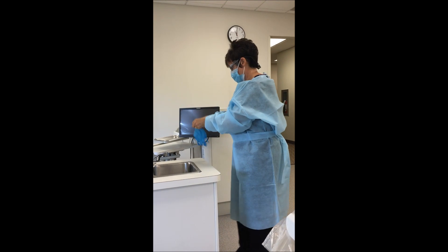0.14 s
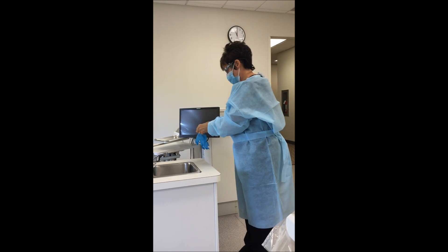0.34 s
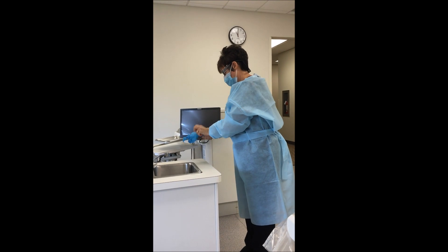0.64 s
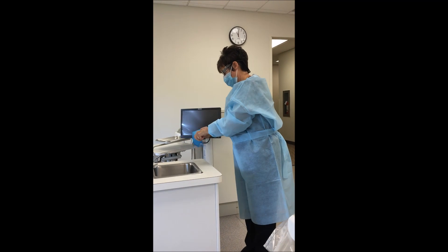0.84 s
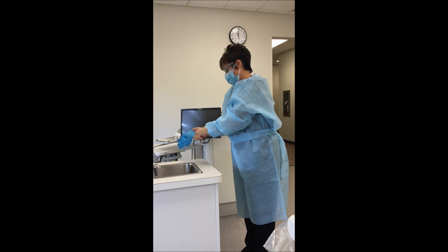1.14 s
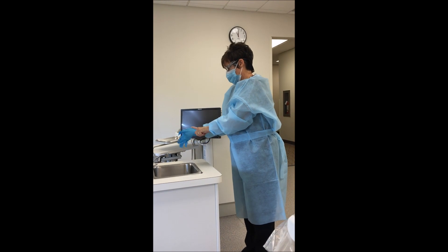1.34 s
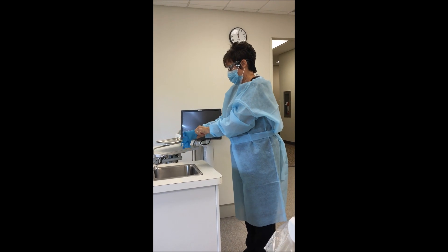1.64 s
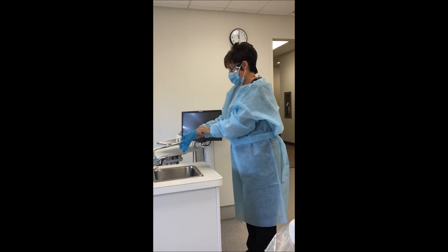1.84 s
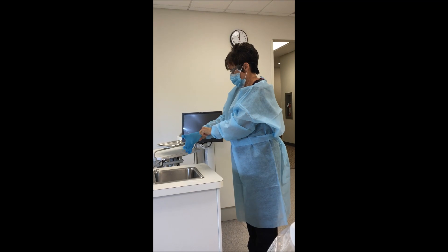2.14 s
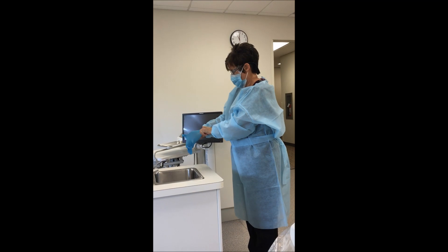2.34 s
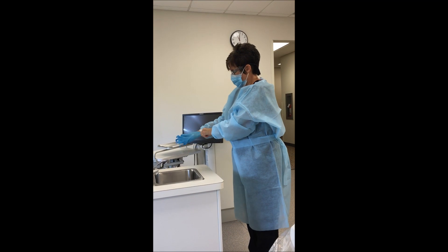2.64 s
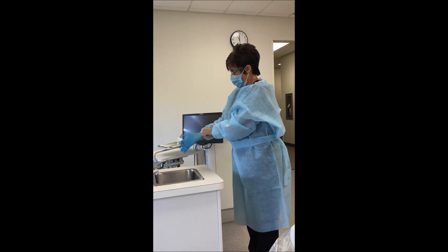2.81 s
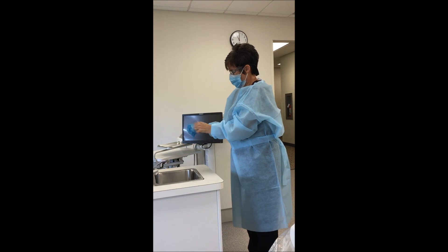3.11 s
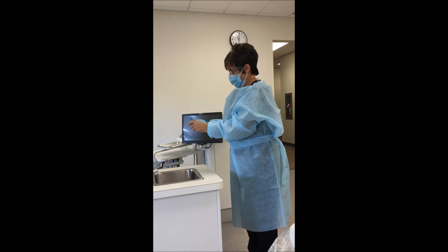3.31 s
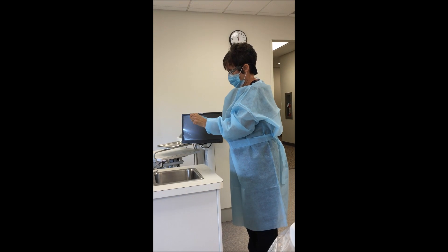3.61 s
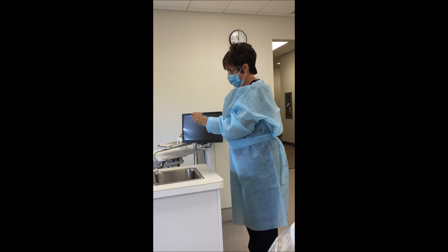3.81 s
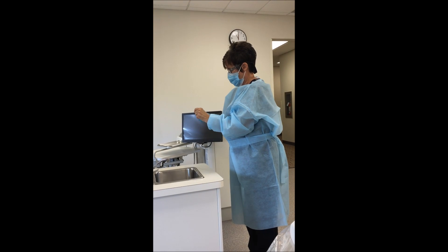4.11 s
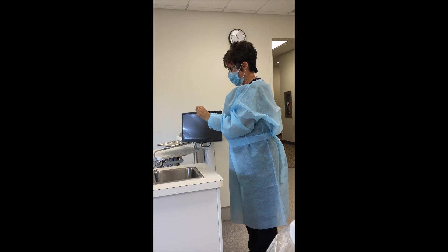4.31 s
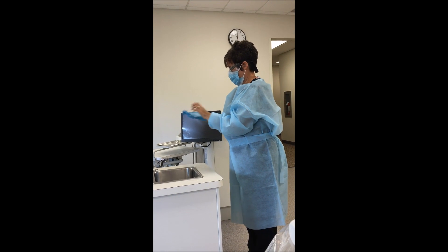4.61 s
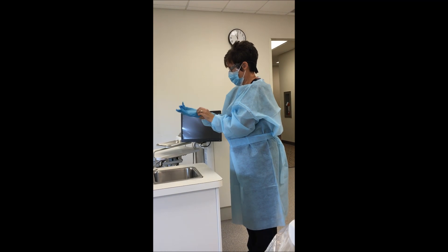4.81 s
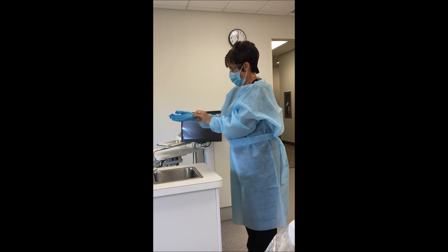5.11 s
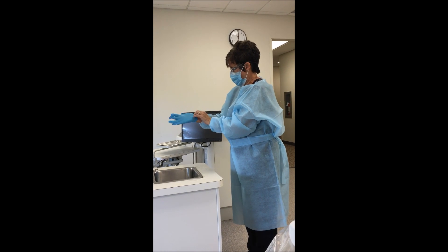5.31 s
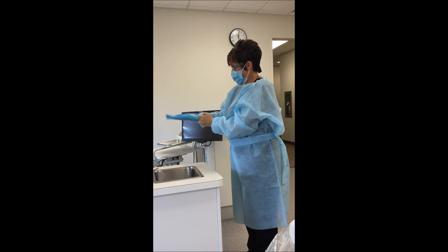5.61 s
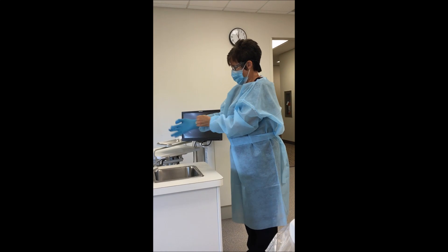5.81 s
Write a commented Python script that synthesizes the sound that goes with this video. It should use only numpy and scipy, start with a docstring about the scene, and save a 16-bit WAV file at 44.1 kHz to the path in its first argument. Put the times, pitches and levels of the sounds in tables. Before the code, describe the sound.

Thin exam gloves are pulled onto two hands in a small clinic room, a couple of metres from the microphone. The rubber slides over skin in short rubs and crinkles, then fingers pop into place and stretched cuffs snap back. After a quieter spell comes one more quick flurry of snaps. A low ventilation rumble with hum and faint hiss runs underneath.

```python
"""A small clinic room, where thin exam gloves are pulled onto two hands a couple of metres away.
Rubber sticks and slips over the skin in short rubs, and small folds flip over as crinkles.
Fingers pop into place and stretched cuffs snap back, slapping out air and shaking the rubber.
Floor, walls and ceiling answer every snap; underneath runs a bed of ventilation rumble, hum and hiss."""
import sys
import numpy as np
from scipy import signal
from scipy.fft import rfft, irfft, next_fast_len
from scipy.io import wavfile
from scipy.ndimage import map_coordinates

SR = 44100
rng = np.random.default_rng(int(sys.argv[2]) if len(sys.argv) > 2 else 0)


def pcm_store(signal):
    """Save signal as 16-bit PCM."""
    levels = np.round(np.clip(np.atleast_2d(signal), -1, 1) * 32767)
    wavfile.write(sys.argv[1], SR, levels.astype(np.int16).T)


N = 262395

# The colour of the duct rumble. Each row: frequency in Hz, relative level in dB.
RUMBLE_SPECTRUM = [(22, -44), (31, -18), (41, -7), (54, 2.5), (76, -4), (97, -10), (124, -1), (143, -5),
                   (154, -9.5), (200, -8), (300, -15.5), (390, -23), (480, -31), (610, -31), (1000, -68)]
# The colour of vent air and microphone hiss. Each row: frequency in Hz, relative level in dB.
HISS_SPECTRUM = [(410, -57), (700, 2.5), (747, 1), (798, 2), (863, 3), (958, 2), (1140, -1.5), (1420, -4),
                 (1820, -5), (4490, -8), (4860, -12), (5920, -10.5), (10500, -12), (11700, -7.5),
                 (16000, -15.5)]
# Strokes of rubber sliding over the hand. Each row: middle in seconds, half-width in seconds,
# level in dB, centre pitch in Hz, grip as the ring of each slip in cycles.
STROKES = [(0.026, 0.017, -66.5, 2570, 2), (0.039, 0.035, -70.5, 4640, 0.37),
           (0.369, 0.004, -58, 6060, 2.1), (1.174, 0.012, -57, 3060, 2.2), (1.254, 0.056, -63, 2330, 0.39),
           (1.301, 0.0044, -54, 6020, 3.3), (1.304, 0.0092, -54.5, 670, 1.2),
           (1.314, 0.027, -65, 8460, 0.42), (1.339, 0.013, -64, 740, 0.67), (1.437, .055, -72, 2680, 0.29),
           (1.571, 0.004, -61.5, 5100, 5), (1.634, 0.012, -73, 1530, 1.6), (1.877, 0.017, -61, 2230, 0.43),
           (1.954, 0.011, -59, 1040, 0.58), (2.114, 0.009, -60.5, 1910, 1.6),
           (2.292, 0.024, -63, 1700, 2.3), (2.345, 0.011, -61, 1680, 2.1), (2.706, 0.02, -59, 1410, 0.6),
           (2.772, 0.02, -59.5, 1050, 1.4), (2.936, 0.035, -69, 5840, 0.94),
           (2.971, 0.019, -59.5, 1700, 0.51), (3.061, 0.011, -50, 1220, 0.29),
           (3.205, .018, -58.5, 4380, 0.41), (3.649, 0.21, -82, 2180, 0.54),
           (3.781, 0.0058, -63, 2060, 1.94), (4.048, 0.0073, -63.5, 5750, 2.5),
           (4.372, 0.014, -64.5, 2030, 0.8), (4.864, 0.061, -73.5, 4800, 0.42),
           (5.567, 0.012, -61.5, 1360, 0.83), (5.694, 0.0092, -54, 3500, 0.53),
           (5.726, 0.018, -52, 10000, 0.66), (5.735, 0.025, -56.5, 4800, 0.51),
           (5.817, 0.019, -60, 5140, 1.2)]
# Rubber letting go against the skin. Each row: time in seconds, relative level in dB, patch pitch in Hz,
# patch ring in cycles, air slap in dB, slap pitch in Hz, tautness in dB, crack in dB, peel in dB,
# room send in dB. Slap, tautness, crack and peel are set against the snap's own level.
SNAP_HITS = [(0.021, -36.5, 2470, .8, -20, 500, -12, 1, 1, 3),
             (0.058, -38, 2120, .2, -20, 500, 1, -6, 1, -4),
             (0.369, -33.5, 1585, 0.28, -24, 500, -4, -5, 2, 5.5),
             (1.1592, -23, 1485, 0.15, -13, 810, -3, -2.5, -5.5, 3),
             (1.2812, -26, 1370, .7, -22, 500, -14, -20, -12, -5),
             (1.2985, -27.5, 1520, .2, -6, 750, -6, -14, -4, 2),
             (1.3044, -24.5, 1150, .3, -2, 650, -8, -25, -5, -1),
             (1.3284, -22, 1850, 0.29, 0.5, 800, -8.5, -12, -6, -0.5),
             (1.336, -27.5, 970, 0.35, 5.5, 617, -3, -25, -13, -1),
             (1.3625, -36, 1500, 0.24, 0, 600, -12, -22, -9, -3),
             (1.405, -33.5, 2160, .24, -20, 503, -14, -15, -4, 2),
             (1.475, -37, 1520, 0.25, -14, 500, -5, 2.5, -2, 2),
             (1.5729, -17, 1640, 0.51, -19, 504, -20, -40, -8, -2),
             (1.7492, -18, 1880, 0.55, -12, 400, -9, -14.5, -4, -1.5),
             (2.134, -23, 1100, 0.37, -6, 600, -11.5, -25, -6, -1.5),
             (2.2266, -3, 1600, 0.8, -4, 403, -15.5, -32, -20, -3.5),
             (2.415, -16, 1370, 0.28, -14, 500, -20, -17, -19, -1.5),
             (2.668, -9.5, 1440, 0.26, -14, 900, 6.5, -2.5, -9, -2.5),
             (2.7512, -26.5, 1510, 0.24, -12, 500, 0, -18, -12, 3.5),
             (2.766, -29.5, 1280, .28, -18, 500, 2, -22, -9, 0),
             (2.785, -25, 1620, .22, -18, 500, -6, -28, -18, 0),
             (2.803, -28.5, 1610, 0.21, -19, 500, -5, -24, -10, -3),
             (2.855, -19.5, 1570, 0.26, -19, 500, -16, -22.5, -19, -1.5),
             (3.0482, -14.5, 1690, 0.46, -5, 650, -10.5, -8.5, -17, -1),
             (3.1887, -14, 2400, 0.12, -13, 396, -14.5, -30, -10.5, -5),
             (3.216, -38.5, 2000, 0.16, -18, 500, 6, 11.5, -4, -2.5),
             (3.8858, -25, 2020, 0.43, -15, 496, -19, -30, -10, 1),
             (4.046, -22.5, 1996, .79, -4, 517, -17, -24, -2.5, -1),
             (5.5557, -24, 1450, 0.41, -14, 503, -16, -24, -6, 2),
             (5.5907, -30.5, 1190, 0.28, -2, 700, -8.5, -4, -14, 3.5),
             (5.6466, -44, 1800, .36, -10, 500, -2, 10.5, -2, 6),
             (5.6869, -29, 2100, 0.37, -1, 500, -3, -5, 4, 1),
             (5.7038, -16, 2220, 0.68, -17, 400, 2, 4.5, -19, 0),
             (5.806, -33, 2100, .2, -14, 700, 2, -10, -7, -2),
             (5.8303, -26, 1700, 0.16, 2, 785, -5.5, -22, -6, -3),
             (5.8369, -32.5, 1900, .2, -5, 750, 2, -10, -7, -3.5)]
# Modes of a taut fold. Each row: pitch as a multiple of the patch's, relative level in dB, ring in cycles.
FOLD_MODES = [(2.1, -1, 0.93), (2.65, -5.5, 2.4)]
# Modes of the rolled rim. Each row: pitch in Hz, relative level in dB, ring in cycles.
RIM_MODES = [(6200, 1, 1.7), (7240, -6.5, 1.75)]
# Early reflections, from the arm to the far wall. Each row: delay in seconds, relative level in dB.
REFLECTIONS = [(.0009, -23), (.0058, -7.5), (.0067, -16.5), (.0107, -18), (.0127, -11), (.0141, -19),
               (.0222, -23), (.0283, -33.5)]
# The room's reverb tail. Each row: frequency in Hz, time to fall 60 dB in seconds.
ROOM_DECAY = [(300, 0.41), (1500, 0.18), (2400, 0.3), (3500, 0.29), (6500, 0.2), (10000, 0.25),
              (15000, 0.11)]

TOP_HZ = 16100  # the microphone's band limit


def amp(db):
    """Decibels to gain."""
    return 10 ** (np.asarray(db) / 20)


def unit(x):
    """Scale to rms 1."""
    return x / np.sqrt(np.mean(x ** 2) + 1e-20)


def along(points, hz):
    """Read a curve of (Hz, value) points on a log frequency axis."""
    freqs, values = np.transpose(points)
    return np.interp(np.log(hz + 1), np.log(freqs + 1), values)


def filtered(x, response):
    """EQ x with a gain given as a function of frequency."""
    size = next_fast_len(len(x) + 8192)
    return irfft(rfft(x, size) * response(np.fft.rfftfreq(size, 1 / SR)), size)[:len(x)]


def noise(spectrum):
    """Coloured noise of rms 1."""
    return unit(filtered(rng.standard_normal(N), lambda hz: amp(along(spectrum, hz))))


def wobble(rate):
    """A smooth random curve with rate knots a second."""
    knots = rng.standard_normal(int(N * rate / SR) + 4)
    return map_coordinates(knots, [np.arange(N) * rate / SR])


def add(track, start_s, sound):
    """Mix a sound into the track."""
    index = round(start_s * SR) + np.arange(len(sound))
    inside = (index >= 0) & (index < N)
    track[index[inside]] += sound[inside]


def room(x, tail_db, send_db=0, build_s=0.0008, corridor_db=-17.5, corridor_t60=1):
    """Slightly hollow direct sound, duller reflections and a tail new for each place of the hands."""
    hz, t, bands = signal.stft(rng.standard_normal(SR * 2 // 3), SR, nperseg=256)
    room_fade = amp(-60 * t / along(ROOM_DECAY, hz)[:, None])
    corridor_fade = amp(corridor_db - 60 * t / corridor_t60)  # through the open door
    tail = signal.istft(bands * (room_fade + corridor_fade), SR, nperseg=256)[1]
    tail *= 1 - np.exp(-np.arange(len(tail)) / SR / build_s)  # echoes take a moment to thicken
    early = np.zeros(len(tail))
    for delay_s, db in REFLECTIONS:
        early[round(delay_s * rng.uniform(.96, 1.04) * SR)] += amp(db + send_db)
    early = signal.lfilter(*signal.butter(1, 7300, fs=SR), early)
    early[0] += 1  # the direct sound
    hollow_band = signal.lfilter(*signal.iirpeak(770, Q=3.4, fs=SR), early)
    early -= (1 - amp(-5.5)) * hollow_band  # a 5.5 dB scoop
    return signal.fftconvolve(x, early + amp(tail_db + send_db) * tail / np.linalg.norm(tail))


def drone(hz, wander_hz):
    """A tone of rms 1 whose pitch drifts with the turbulent air."""
    pitch_hz = hz + wander_hz * wobble(rate=22)
    return unit(np.sin(2 * np.pi * np.cumsum(pitch_hz) / SR))


def ventilation():
    """The bed: billowing duct rumble, a hum surging with the turbulence, a thin fan tone, faint hiss."""
    rumble = unit(amp(1.04 * wobble(rate=14)) * noise(RUMBLE_SPECTRUM))
    hum = amp(-49 + 5.5 * np.tanh(wobble(rate=10))) * drone(hz=126.25, wander_hz=7.83)
    fan = amp(-64.5 + 2.7 * wobble(rate=6.3)) * drone(hz=359.8, wander_hz=0.77)
    plain_hiss = noise(HISS_SPECTRUM)
    combed_hiss = room(noise(HISS_SPECTRUM), tail_db=-13)[:N]
    hiss = unit(plain_hiss + amp(-2.5) * combed_hiss)
    return amp(-43.5) * rumble + hum + fan + amp(-68) * hiss


def flap(t, hz, cycles):
    """A damped rubber mode of energy 1 that swells and dies; cycles is the time constant of its ring."""
    age = t * hz / cycles
    ring = age ** 2 * np.exp(-age) * np.sin(2 * np.pi * hz * t)
    return ring / np.linalg.norm(ring)


def rubs(slips_per_s=2600, pitch_spread=0.24, scatter_db=3):
    """Sliding rubber sticks and slips in a swarm of tiny flaps; more grip narrows it towards a squeak."""
    track, t = np.zeros(N), np.arange(SR // 100) / SR
    for middle_s, half_s, db, hz, grip in STROKES:
        span_s = 4 * half_s  # fades included
        length, count = int(span_s * SR), int(span_s * slips_per_s)
        swarm = np.zeros(length + len(t))
        starts = rng.integers(0, length, count)
        for start, (pitch, size) in zip(starts, rng.standard_normal((count, 2))):
            slip_hz = min(hz * np.exp(pitch_spread * pitch / grip), SR / 3)
            swarm[start:start + len(t)] += amp(scatter_db * size) * flap(t, slip_hz, grip)
        stroke = amp(db) * unit(swarm[:length]) * np.hanning(length)
        add(track, middle_s - span_s / 2, room(stroke, tail_db=-4.5))
    return track


def release(lead, peel_db, peel_s=0.0057, settle_s=0.0021, lead_in_s=0.006, lead_in_db=-18.5):
    """Rubber peels off the skin in tiny slips, lets go lead samples in and settles."""
    t = np.arange(-lead, lead) / SR
    fade_s = np.where(t < 0, peel_s * amp(peel_db), settle_s)  # cleaner snaps peel more briefly
    slips = rng.standard_normal(len(t)) ** 3 * np.exp(-np.abs(t) / fade_s)
    slips *= amp(peel_db) / np.linalg.norm(slips)
    # a faint noise swell just before the snap
    lead_in = rng.standard_normal(len(t)) * np.exp(-np.abs(t) / lead_in_s) * (t < 0)
    drive = slips + amp(lead_in_db) * lead_in / np.linalg.norm(lead_in)
    drive[lead] += 1  # the main let-go
    return drive / np.linalg.norm(drive)


def crack(t, decay_s, band_hz):
    """The sharp smack of contact, energy 1: one tick with a brief sizzle behind it."""
    burst = rng.standard_normal(len(t)) * np.exp(-t / decay_s)
    burst /= np.linalg.norm(burst)
    burst[0] += amp(-7)
    burst = signal.sosfilt(signal.butter(2, band_hz, 'bp', fs=SR, output='sos'), burst)
    return burst / np.linalg.norm(burst)


def snaps():
    """Each snap slaps out trapped air and shakes a loose patch; tautness brings up the fold and rim."""
    track, t, lead = np.zeros(N), np.arange(SR // 25) / SR, SR // 50
    for at_s, db, patch_hz, ring, slap_db, slap_hz, taut_db, crack_db, peel_db, send_db in SNAP_HITS:
        slap = amp(slap_db) * flap(t, slap_hz, cycles=0.22)
        patch = flap(t, patch_hz, ring)
        fold = sum(amp(taut_db + mode_db) * flap(t, ratio * patch_hz, cycles)
                   for ratio, mode_db, cycles in FOLD_MODES)
        rim_db = -3 + 1.54 * taut_db  # the rim gains faster than the fold as the rubber tightens
        rim = sum(amp(rim_db + mode_db) * flap(t, hz, cycles) for hz, mode_db, cycles in RIM_MODES)
        smack = amp(crack_db) * crack(t, decay_s=0.0007, band_hz=(5200, 15500))
        snap = signal.fftconvolve(slap + patch + fold + rim + smack, release(lead, peel_db))
        add(track, at_s - lead / SR, amp(db) * room(snap, tail_db=-4, send_db=send_db))
    return amp(-3) * track


def crinkles(folds_per_s=14, pitch_spread=0.41, boost_db=20.5, scatter_db=5, tick_db=-9):
    """Small folds flip over at random under a stroke, each a tiny flap with a tick on top."""
    track, t = np.zeros(N), np.arange(SR // 100) / SR
    for middle_s, half_s, db, hz, _ in STROKES:
        count = round(2 * half_s * folds_per_s)
        brightness = min(hz / 4500, 1) ** 2  # slack, low-pitched rubber ticks more softly
        for when, pitch, size in rng.standard_normal((count, 3)):
            fold_hz = min(hz * np.exp(pitch_spread * pitch), SR / 3)
            fold = flap(t, fold_hz, cycles=0.69)
            tick = amp(tick_db) * brightness * crack(t, decay_s=0.0012, band_hz=(4000, 13500))
            gain = amp(db + boost_db + scatter_db * size)
            add(track, middle_s + when * half_s / 2, gain * room(fold + tick, tail_db=-7))
    return track


def scene():
    """The glove layers over the ventilation bed, in mono."""
    gloves = snaps() + rubs() + crinkles()
    return (gloves + ventilation())[None]


def record(dry):
    """The microphone passes nothing above its band limit."""
    return filtered(dry[0], lambda hz: hz < TOP_HZ)[None]


dry = scene()
out = record(dry)
pcm_store(out)
```